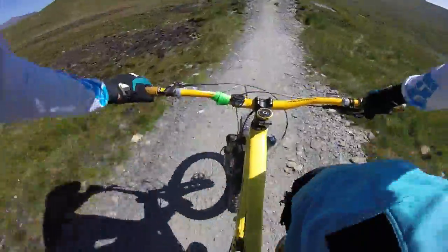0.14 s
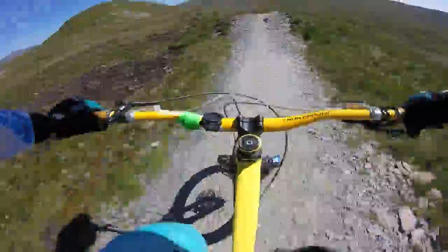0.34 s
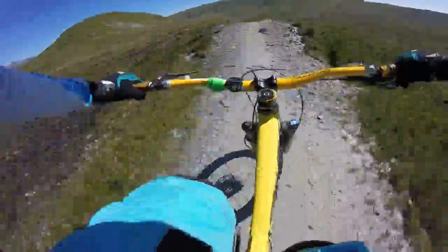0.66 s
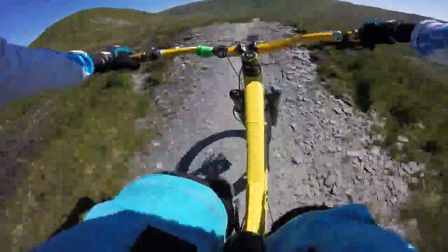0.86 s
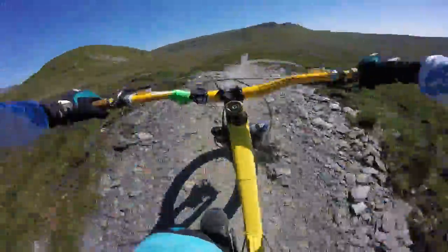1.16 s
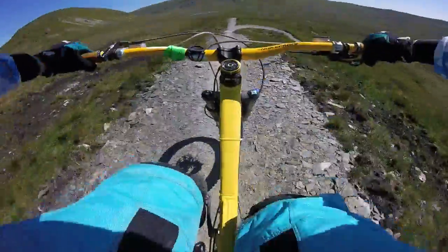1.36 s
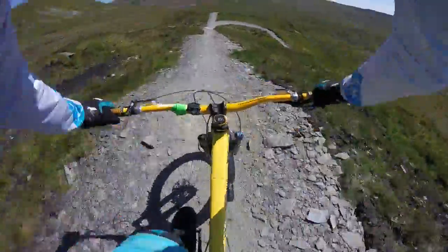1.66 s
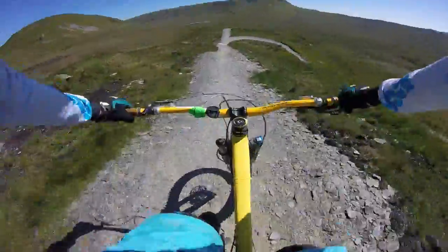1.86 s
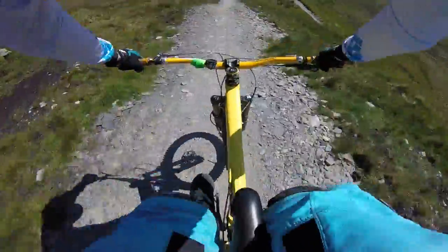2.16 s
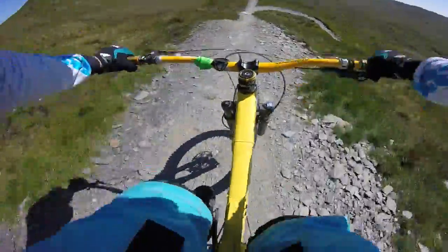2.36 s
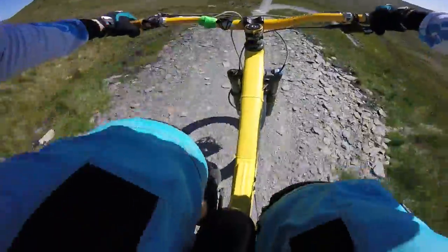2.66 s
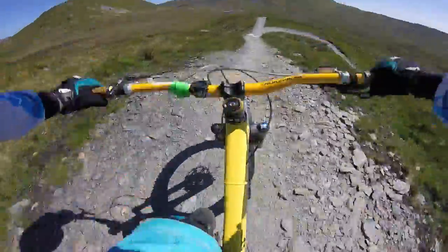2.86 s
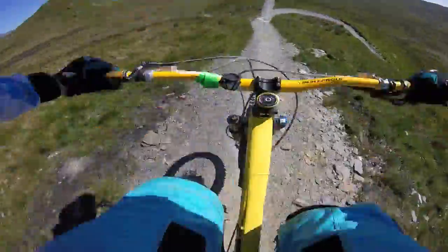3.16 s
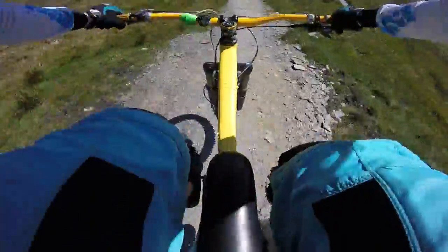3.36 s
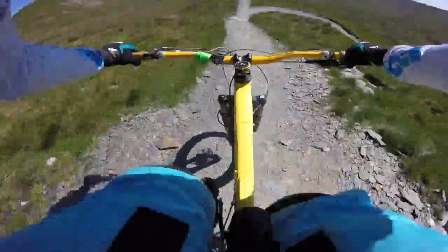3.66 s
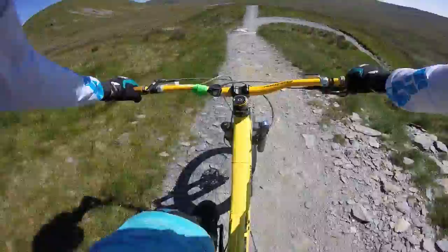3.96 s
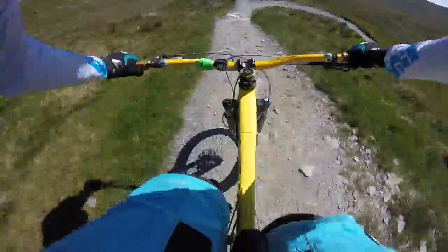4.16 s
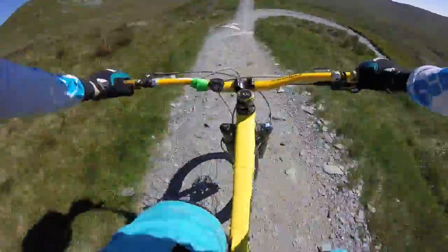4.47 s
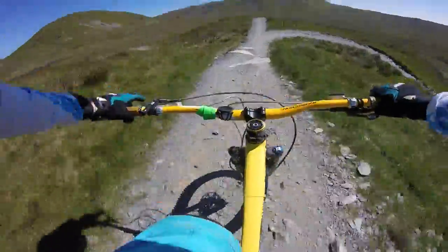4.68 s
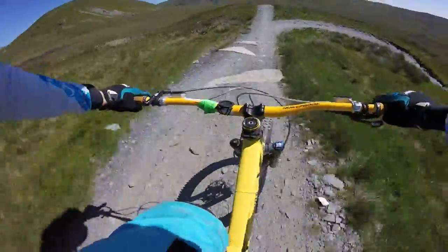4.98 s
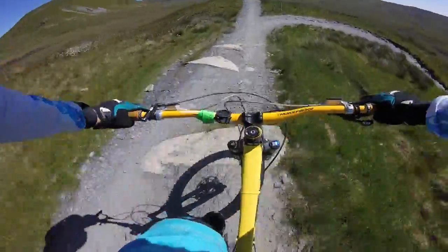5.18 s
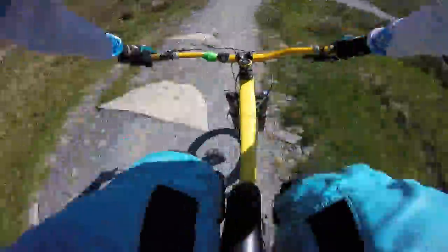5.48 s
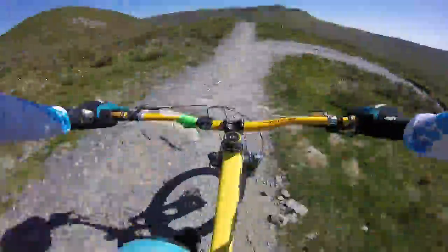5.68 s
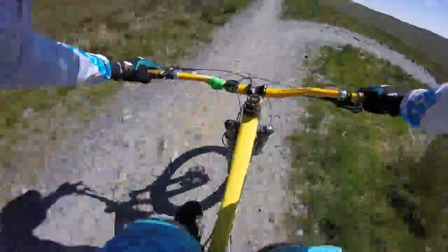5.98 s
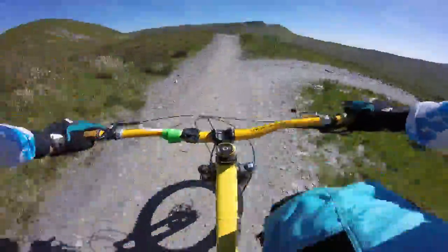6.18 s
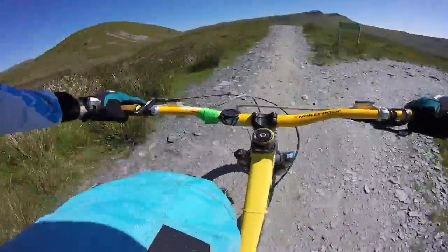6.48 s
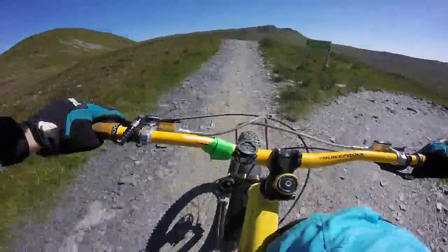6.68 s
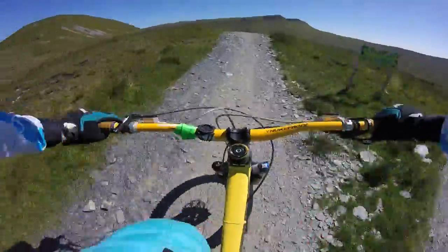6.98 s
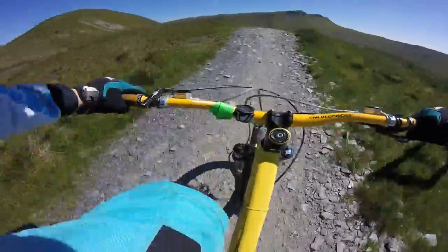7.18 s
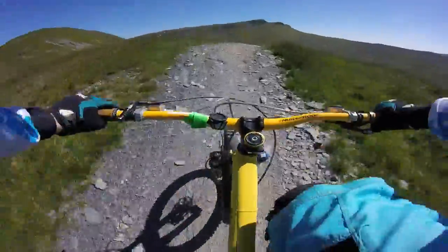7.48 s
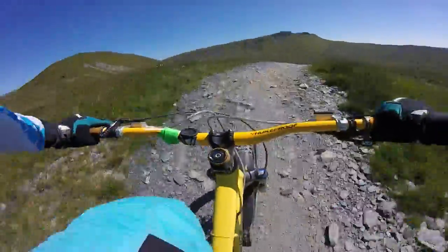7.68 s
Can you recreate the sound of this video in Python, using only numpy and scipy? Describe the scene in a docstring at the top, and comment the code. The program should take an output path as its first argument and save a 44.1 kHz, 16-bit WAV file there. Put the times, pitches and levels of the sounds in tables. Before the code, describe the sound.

A mountain bike speeds along an open stony hillside trail, heard from a microphone in a plastic case on the rider's chest. Grainy tyre crunch swells and dips, with scattered stone clacks and brief skids. Low wind heaves and flutters. A hard thump opens it with a short buzz; a cluster of jolts comes past the middle, then more loud clacks near the end.

```python
"""Gravel crunches under the tyres of a mountain bike on a trail, as grainy noise coloured by the plastic
case of a chest camera. Stone clacks and skids ring the same case as noise bursts. Filtered noise and
damped swings give wind and flutter on the case's membrane, under a thin steady rush of noise.
Hard jolts thump as decaying sines with sharp edges, and a loose part buzzes on in two narrow modes."""
import sys
import numpy as np
from scipy import signal
from scipy.fft import rfft, irfft
from scipy.io import wavfile
from scipy.ndimage import uniform_filter1d

SR = 44100
rng = np.random.default_rng(int(sys.argv[2]) if len(sys.argv) > 2 else 0)


def master_out(mix):
    """Clip the mix to full scale and print it as 16-bit PCM to the path in sys.argv[1]."""
    frames = np.transpose(np.atleast_2d(mix))
    ceiling = np.clip(frames, -1, 1)
    pcm = np.round(ceiling * 32767).astype(np.int16)
    wavfile.write(sys.argv[1], SR, pcm)


N = 345744
HZ = np.fft.rfftfreq(2 ** 14, 1 / SR)  # frequency grid of all filters


def undb(db):
    """dB to gain."""
    return 10 ** (np.asarray(db) / 20)


def unit(x):
    """Scale to rms 1."""
    return x / np.sqrt(np.mean(x ** 2))


def curve(points):
    """A (t/s, value) table read at every sample."""
    return np.interp(np.arange(N) / SR, *np.transpose(points))


def shape(points):
    """Gain over HZ from (f/Hz, level/dB) points, joined on a log frequency axis."""
    hz, db = np.transpose(points)
    return undb(np.interp(np.log(HZ + 1), np.log(hz), db))


def ring(modes):
    """Power gain of resonances (f/Hz, width/Hz, level/dB), each 6 dB down at the edges of its width."""
    power = 0
    for hz, width, db in modes:
        detune = 2 * (HZ - hz) / width
        power = power + undb(2 * db) / (1 + detune ** 2) ** 2
    return power


def through(x, gain):
    """Causal filter of the given gain, its phase taken from the cepstrum; white noise keeps its rms."""
    cepstrum = irfft(np.log(gain + 1e-7))
    # folding the cepstrum onto positive time makes the filter minimum phase
    cepstrum[1:len(cepstrum) // 2] *= 2
    cepstrum[len(cepstrum) // 2 + 1:] = 0
    response = irfft(np.exp(rfft(cepstrum)))
    return signal.fftconvolve(x, response / np.sqrt(np.mean(gain ** 2)))[:N]


def walk(rate):
    """Random levels held 1 / rate s and slewed twice; spread 1."""
    hold = int(SR / rate)
    steps = np.repeat(rng.standard_normal(N // hold + 1), hold)
    slewed = uniform_filter1d(uniform_filter1d(steps, hold), hold)[:N]
    return slewed / slewed.std()


def grains(rate, spread_db, length_ms):
    """Envelope of scattered short crunches, rate per second: most are faint, a few stand out."""
    when = rng.random(N) < rate / SR
    size = undb(spread_db * np.minimum(rng.exponential(size=N), 3.5))
    decay = np.exp(-2000 / (length_ms * SR))
    power = signal.lfilter([1], [1, -decay], when * size ** 2)  # overlapping grains add in power
    return np.sqrt(power)


# case and port resonances, levels relative: (f/Hz, width/Hz, level/dB)
CASE_MODES = [(534, 105, -7), (1571, 290, 2), (1953, 142, -2.5), (2366, 250, -6.5), (2674, 225, -6.5),
              (3185, 420, -3.5), (4100, 1000, -21), (6160, 1400, -24), (7280, 116, -18), (8050, 380, -51),
              (9350, 400, -39)]
# sound passing through the case walls, on the same level scale: (f/Hz, level/dB)
WALL_LEAK = [(300, -33), (800, -21), (1300, -11), (3000, -9.5), (4000, -22.5), (5000, -26), (9000, -27.5),
             (12000, -38), (15000, -49)]


def case_bands(edges_hz):
    """The case passes sound through its walls and by its resonances; split at the edges into parts."""
    below = [0] + [1 / (1 + (HZ / hz) ** 16) for hz in edges_hz] + [1]
    power = shape(WALL_LEAK) ** 2 + ring(CASE_MODES)
    return [np.sqrt(power * np.maximum(upper - lower, 0)) for lower, upper in zip(below, below[1:])]


# load on the tyres, given as the level of the crunch: (t/s, level/dB)
TYRE_LOAD = [(0.0, -33.5), (0.08, -38), (0.18, -53), (0.48, -41.5), (0.65, -39), (0.95, -44.5),
             (1.14, -42.5), (1.29, -38.5), (1.45, -46), (1.64, -43), (1.81, -37), (1.94, -35.5),
             (2.03, -44.5), (2.2, -52), (2.45, -41), (2.77, -45.5), (3.05, -37.5), (3.19, -46.5),
             (3.45, -47), (3.67, -37.5), (4.04, -44.5), (4.43, -37), (4.9, -41.5), (5.13, -40),
             (5.57, -43.5), (5.7, -34.5), (5.82, -34), (5.88, -42.5), (6.05, -45), (6.29, -39.5),
             (6.42, -38.5), (6.83, -37.5), (7.1, -44), (7.44, -39), (7.62, -45.5), (7.84, -41)]
USUAL_LOAD_DB = -42


def tyre_load():
    """Load sets the crunch level, and drives grit, flutter and small stones by its excess over usual."""
    crunch_db = curve(TYRE_LOAD)
    return crunch_db, crunch_db - USUAL_LOAD_DB


# borders between parts of the crunch that flicker partly on their own: (f/Hz)
CRUNCH_EDGES_HZ = [1940, 2310, 2940, 4330, 6800, 7540, 10100]
GRIT_DB, GRIT_PER_DB = -64, 1.39  # bright grit at the usual load, and its dB per dB of load


def gravel(crunch_db, load_db):
    """Tyres crush gravel: a bed of noise and dense grains, each resonance flaring partly on its own."""
    shared = unit(grains(rate=150., spread_db=1.0, length_ms=16.0))
    patch_db = 1.17 * walk(25)
    body, bright = 0, 0
    for gain, top_hz in zip(case_bands(CRUNCH_EDGES_HZ), CRUNCH_EDGES_HZ + [SR]):
        own = unit(grains(rate=60., spread_db=3.0, length_ms=7.7))
        push = .5 + 0.37 * shared + .5 * own
        flicker = undb(patch_db + 2.56 * walk(14))
        weight = np.sqrt(np.mean(gain ** 2))  # restores the band's level in the case
        part = weight * flicker * through(push * rng.standard_normal(N), gain)
        if top_hz < 5000:
            body = body + part
        else:
            bright = bright + part
    grit_db = GRIT_DB + GRIT_PER_DB * load_db
    return undb(crunch_db) * unit(body) + undb(grit_db) * unit(bright)


# strength of the slow wind, before its random swell: (t/s, level/dB)
WIND_STRENGTH = [(0.0, -28.5), (0.65, -32), (1.1, -41.5), (1.3, -29.5), (1.62, -44), (2.0, -25),
                 (2.14, -40), (2.4, -28), (2.9, -35.5), (3.25, -44.5), (3.67, -29), (4.04, -33),
                 (4.74, -29), (5.1, -36), (5.75, -25.5), (6.05, -38), (6.8, -32), (7.4, -35.5),
                 (7.84, -36.5)]
# spectrum of slow wind pressure, levels relative: (f/Hz, level/dB)
HEAVE_SPECTRUM = [(8, -15.5), (18, 10.5), (30, 7.5), (60, -7.5), (120, -31.5), (300, -54), (3000, -120)]
# single gusts that suck the membrane out and let go, level before swell and fade: (t/s, level/dB, f/Hz)
GUST_SWINGS = [(1.73, -13, 17), (2.348, -9.5, 24), (3.141, -13, 18), (3.189, -15, 20.6), (3.601, -14, 19),
               (5.331, -18, 27), (5.637, -9, 24), (5.72, -15.5, 22), (6.201, -15.5, 25),
               (6.325, -15.5, 20.6), (6.525, -15, 18.4), (6.771, -14, 21), (7.775, -21, 25)]
# spectrum of membrane flutter, levels relative: (f/Hz, level/dB)
FLUTTER_SPECTRUM = [(40, -17.5), (80, -4.5), (110, -4), (150, 0.5), (200, -9.5), (260, -15.5), (400, -20),
                    (700, -27.5), (1200, -35), (2500, -55), (10000, -110)]
FLUTTER_DB, FLUTTER_PER_DB = -38.5, 0.55  # flutter at the usual load, and its dB per dB of load


def wind(load_db):
    """Wind heaves slowly on the membrane, in single gusts too, and makes it flutter in puffs."""
    slow = unit(through(rng.standard_normal(N), shape(HEAVE_SPECTRUM)))
    heave = slow * undb(curve(WIND_STRENGTH) + 2.9 * walk(7.5))
    t = np.arange(N) / SR
    for s, db, hz in GUST_SWINGS:
        turns = np.clip((t - s) * hz, 0, 4)  # cycles since the gust began
        envelope = np.minimum(turns / 0.36, 1) * np.exp(-turns / 0.72)
        heave -= undb(db) * np.sin(2 * np.pi * turns) * envelope
    puffs = 1.14 + unit(grains(rate=84.0, spread_db=4.5, length_ms=10.4))
    flutter = unit(through(puffs * rng.standard_normal(N), shape(FLUTTER_SPECTRUM)))
    return heave + flutter * undb(FLUTTER_DB + FLUTTER_PER_DB * load_db)


def air(bright_band):
    """A thin steady rush of noise in the bright part of the case."""
    return undb(-69) * through(rng.standard_normal(N), bright_band)


# jolts of the mount, levels before swell, decay and lowpass:
# (t/s, knock level/dB, knock f/Hz, knock t60/s, rebound level/dB, rebound f/Hz, edge level/dB)
MOUNT_JOLTS = [(0.061, 5.5, 130, 0.034, -3, 28, -10.5), (1.9217, 0.5, 105, 0.022, -1, 21.7, -19),
               (3.0797, -7, 132, 0.07, -6, 20, -8.5), (3.812, 14.5, 108, 0.012, -1, 30.6, -5),
               (4.2689, -7, 147, 0.048, -10, 13.4, -30), (4.4083, -2, 132, 0.039, -5.5, 20, -15.5),
               (4.5492, 9, 104, 0.017, -1, 21, -4.5), (4.6831, 4.5, 143.5, 0.035, -5.5, 20, -4),
               (4.8384, 1.5, 120, 0.036, -6, 39.4, -17), (5.8544, 3.5, 124, 0.028, 1, 39, -14),
               (6.6153, -2, 132, 0.039, -10, 16, -20), (6.8727, -9.5, 132, 0.062, -13, 23, -32)]


def jolts():
    """The camera is knocked inside its case and hits its stop, and the membrane rings; the trapped air then
    swings back slowly."""
    t, out = np.arange(SR // 4) / SR, np.zeros(N + SR)
    swell = 1 - np.exp(-(t / .0022) ** 2)
    late = np.maximum(t - .003, 0)  # the rebound waits 3 ms
    from_stop = t - .0026  # s from the end of the travel
    shell = np.cos(2 * np.pi * 550 * from_stop) * undb(-60 * np.abs(from_stop) / 0.021)  # lowest case mode
    tip = np.exp(-np.abs(from_stop) / 0.00062)  # sharp tip where the travel ends
    for s, db, hz, t60, back_db, back_hz, edge_db in MOUNT_JOLTS:
        knock = undb(db) * np.sin(2 * np.pi * hz * (t - .0008)) * undb(-60 * t / t60) * swell
        rebound = -undb(back_db) * np.sin(2 * np.pi * back_hz * late) * np.exp(-late * back_hz / 0.43)
        edge = undb(edge_db) * swell * (tip + 0.29 * shell)
        start = int(s * SR)
        out[start:start + len(t)] += knock + rebound + edge
    return signal.sosfilt(signal.butter(2, 1300, fs=SR, output="sos"), out[:N])


# buzzing after a blow, level before its flicker: (t/s, level/dB, t60/s)
BUZZ_BLOWS = [(0.067, -33, 0.7), (6.36, -37, 1)]
# modes of the loose part, levels relative: (f/Hz, width/Hz, level/dB)
LOOSE_PART_MODES = [(775, 98, -12), (1584, 165, -2)]


def buzz():
    """A loose part chatters in two narrow modes and dies away."""
    t, push = np.arange(N) / SR, 0
    for s, db, t60 in BUZZ_BLOWS:
        onset = (t > s) * np.minimum((t - s) / 0.0031, 1)
        push = push + onset * undb(db - 60 * np.maximum(t - s, 0) / t60)
    chatter = push * undb(1.4 * walk(90)) * rng.standard_normal(N)
    return through(chatter, np.sqrt(ring(LOOSE_PART_MODES)))


# the loudest stones striking frame and rims, drive levels before rise and fade:
# (t/s, low clack level/dB, mid clack level/dB, bright tick level/dB)
LOUD_STONES = [(0.073, -18.5, -37, -45), (0.2198, -34, -39, -35.5), (0.2706, -28, -27.5, -35.5),
               (0.3464, -35, -55, -47), (0.516, -23.5, -22.5, -42), (0.5545, -44, -28.5, -55),
               (0.571, -34, -35, -38.5), (1.1367, -28, -36, -53), (1.1667, -27, -26, -55),
               (1.284, -50, -39, -41.5), (1.4107, -44, -26.5, -43), (1.8098, -51, -28, -38),
               (1.9772, -31, -19.5, -31), (2.362, -27, -30, -41.5), (2.994, -32, -44, -47),
               (3.1087, -39, -31, -42.5), (3.5765, -28.5, -50, -57), (3.6567, -28, -22.5, -31),
               (3.695, -21.5, -28, -34), (3.732, -20.5, -27, -35.5), (3.812, -27, -26, -58),
               (4.072, -30.5, -32, -44), (4.214, -43, -27, -43), (4.3307, -33, -38, -40.5),
               (4.458, -22, -23, -37.5), (4.523, -28, -35, -42), (4.57, -32.5, -30, -40.5),
               (4.643, -43, -26, -55), (4.725, -28.5, -21, -40), (4.902, -29, -31, -44),
               (4.9344, -28, -31.5, -39), (4.9903, -31, -23.5, -39), (5.0357, -19, -38, -40),
               (5.043, -29, -40, -50), (5.106, -32, -28, -50), (5.1898, -30, -25, -46),
               (5.2105, -19.5, -45, -60), (5.524, -25.5, -33.5, -45), (5.6157, -26, -40, -58),
               (5.6302, -31, -48, -57), (5.658, -31, -33, -49), (5.725, -34, -37, -38.5),
               (5.7474, -43, -23.5, -38), (5.778, -36, -35, -41), (6.083, -34.5, -57, -43.5),
               (6.2625, -32, -30, -43), (6.3538, -21, -25, -46), (6.3644, -24, -27, -38.5),
               (6.5938, -23.5, -30, -44), (6.7377, -17.5, -15, -34.5), (6.7685, -23, -30.5, -43),
               (6.844, -35, -40, -38), (6.8655, -25, -34, -62), (6.9268, -27.5, -50, -46),
               (7.138, -31.5, -27.5, -43.5), (7.36, -49, -45, -43), (7.405, -22, -16, -42),
               (7.628, -34.5, -37, -43.5), (7.7448, -18, -20.5, -38.5), (7.7685, -24, -25.5, -40),
               (7.786, -22, -29, -56)]
# small stones' drive at the usual load, low, mid and bright part: (level/dB)
SMALL_STONE_LEVELS = [-40.5, -44, -53]
SMALL_STONES_PER_S = 5  # at the usual load
SMALL_PER_DB, SMALL_SCATTER_DB = 0.57, 6.5  # dB per dB of load, and random spread before its limits
STRIKE_RISE_S, STRIKE_FADE_S = [.003, 0.0022, 0.0019], [0.0047, 0.0046, 0.0043]  # low, mid, bright part


def strikes(load_db):
    """Envelopes of stone strikes in three bands: a quick rise under an exponential fade."""
    t, push = np.arange(2000) / SR, np.zeros((3, N + SR))
    burst = np.minimum(t / np.c_[STRIKE_RISE_S], 1) * np.exp(-t / np.c_[STRIKE_FADE_S])
    when = np.flatnonzero(rng.random(N) < SMALL_STONES_PER_S * undb(load_db) / SR)  # more under load
    scatter = np.clip(rng.standard_normal(size=(N // 1000, 3)), -2, 1.5)[:len(when)]
    small_db = SMALL_STONE_LEVELS + SMALL_PER_DB * load_db[when, None] + SMALL_SCATTER_DB * scatter
    for s, *parts_db in LOUD_STONES + list(np.c_[when / SR, small_db]):
        start = int(s * SR)
        push[:, start:start + len(t)] += undb(parts_db)[:, None] * burst
    return push[:, :N]


# the tyre sliding through loose stones, mid-band drive before roughness: (t/s, length/ms, level/dB)
TYRE_SKIDS = [(.61, 41, -39), (1.195, 45, -47), (1.455, 18, -46), (2.36, 108, -39), (3.151, 40, -36.5),
              (5.385, 83, -39.5), (6.188, 92, -39.5), (6.358, 39, -40.5)]
SKID_LOW_DB, SKID_BRIGHT_DB = -9, -19  # beside the middle part


def skids():
    """Envelopes of a sliding tyre in three bands: rounded stretches of rough, wavering level."""
    push = np.zeros((3, N))
    rough = undb(1.5 * walk(70))
    for s, ms, db in TYRE_SKIDS:
        at = slice(int(s * SR), int((s + ms / 1000) * SR))
        rounded = signal.windows.tukey(at.stop - at.start, .6)
        levels = undb([[db + SKID_LOW_DB], [db], [db + SKID_BRIGHT_DB]])
        push[:, at] += levels * rounded * rough[at]
    return push


def stones(bands, load_db):
    """Strikes and skids are noise that rings the case, each with its own balance of parts."""
    out = 0
    for push, gain in zip(strikes(load_db) + skids(), bands):
        # a blow drives the strongest modes more than the steady crunch does
        out = out + through(push * rng.standard_normal(N), gain ** 1.3)
    return out


def scene():
    """All sources at the single microphone; load adds crunch, grit, flutter and small stones."""
    crunch_db, load_db = tyre_load()
    bands = case_bands([2280, 4380])  # low, mid and bright part, edges in Hz
    tyres = gravel(crunch_db, load_db) + stones(bands, load_db)
    mix = tyres + wind(load_db) + air(bands[-1]) + jolts() + buzz()
    return mix[None]


def record(dry):
    """The recorder clips at full scale, then a steep lowpass cuts the top above 15.2 kHz."""
    lowpass = signal.ellip(10, .2, 80, 15200, fs=SR, output="sos")
    return signal.sosfilt(lowpass, np.clip(dry, -1, 1))


dry = scene()
out = record(dry)
master_out(out)
```